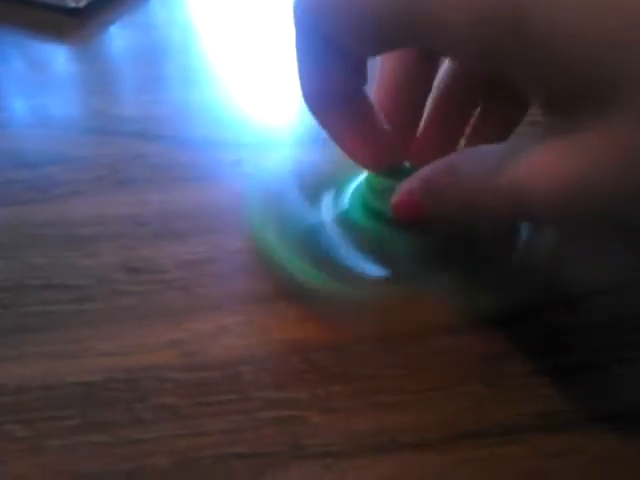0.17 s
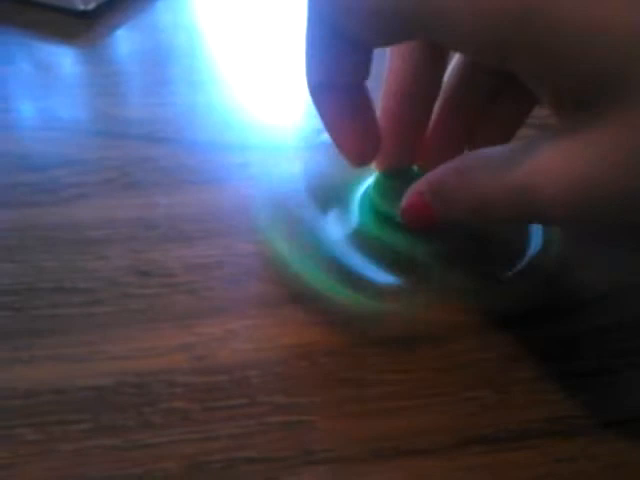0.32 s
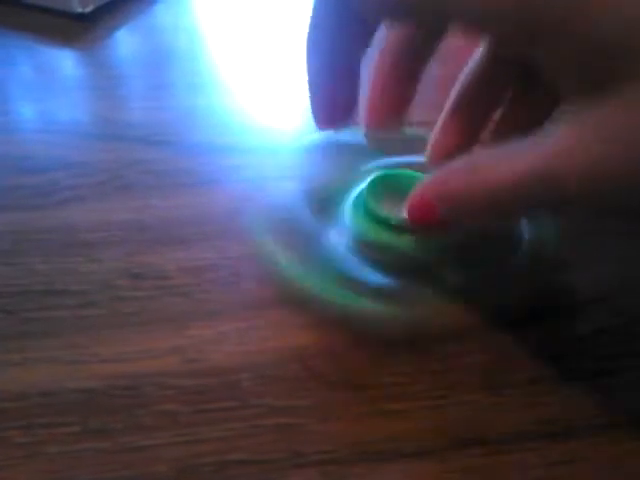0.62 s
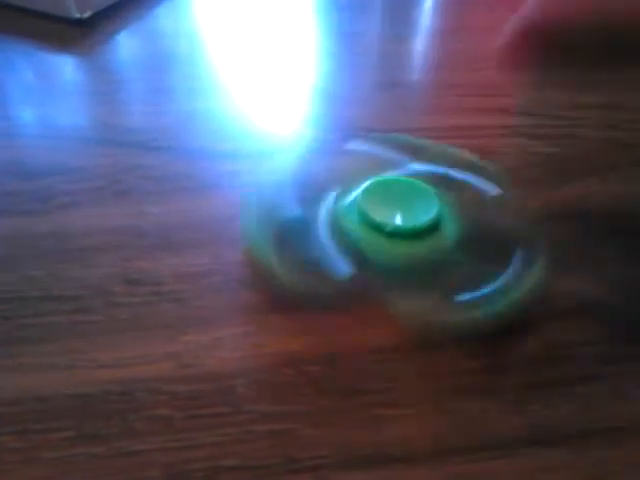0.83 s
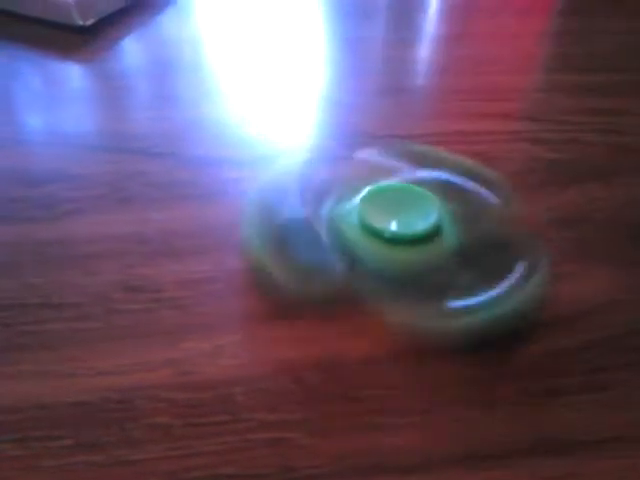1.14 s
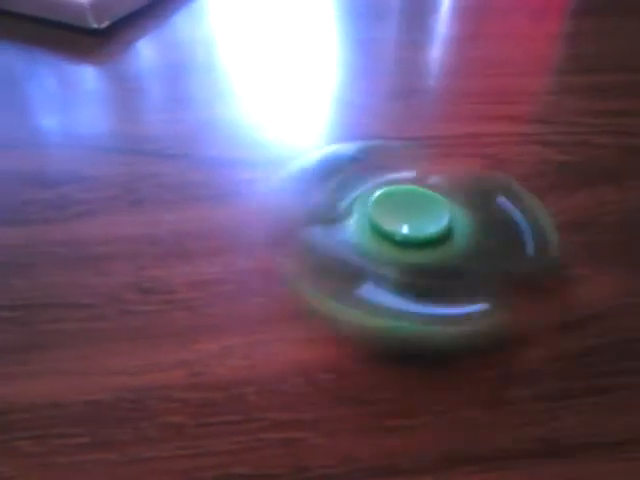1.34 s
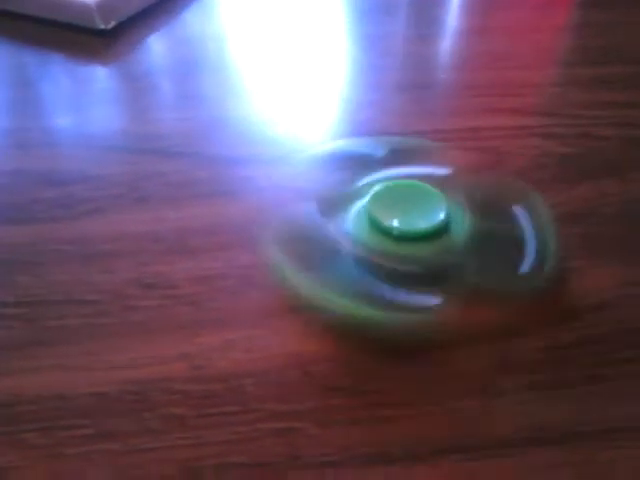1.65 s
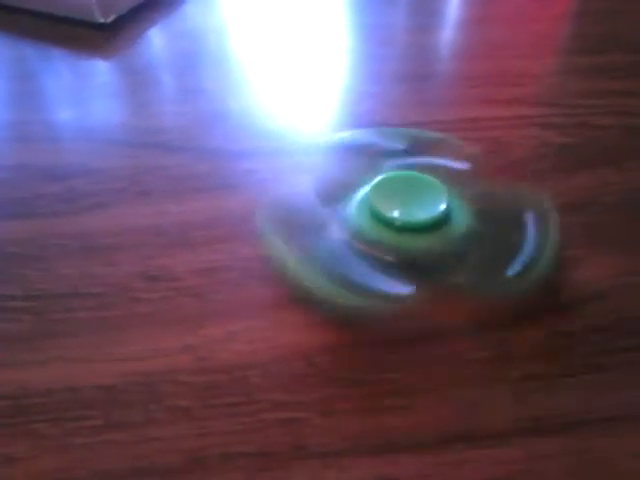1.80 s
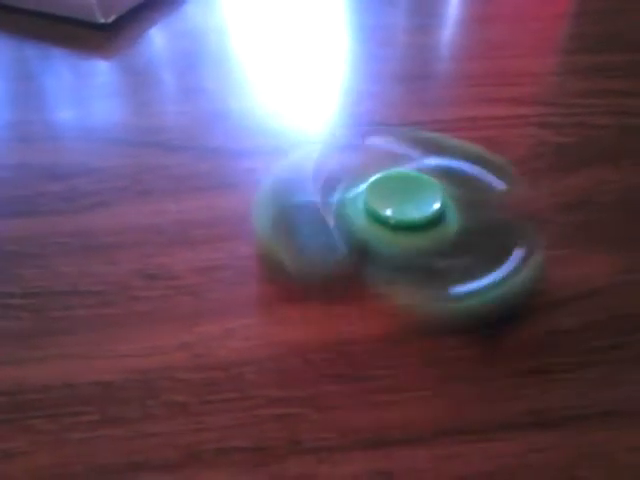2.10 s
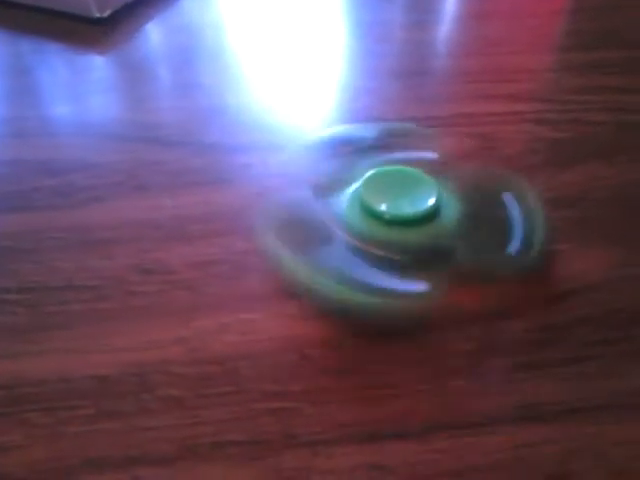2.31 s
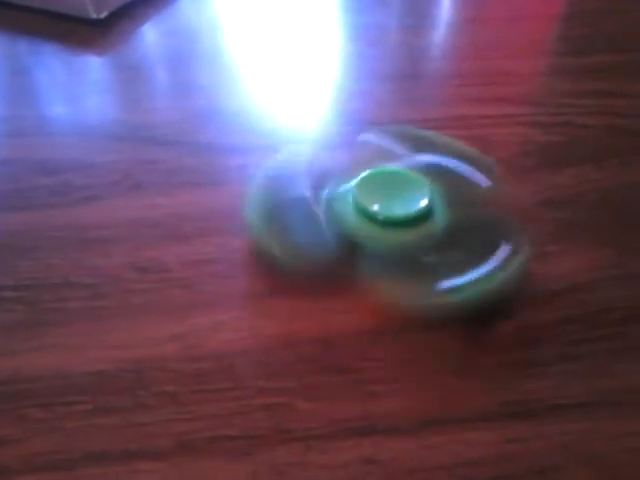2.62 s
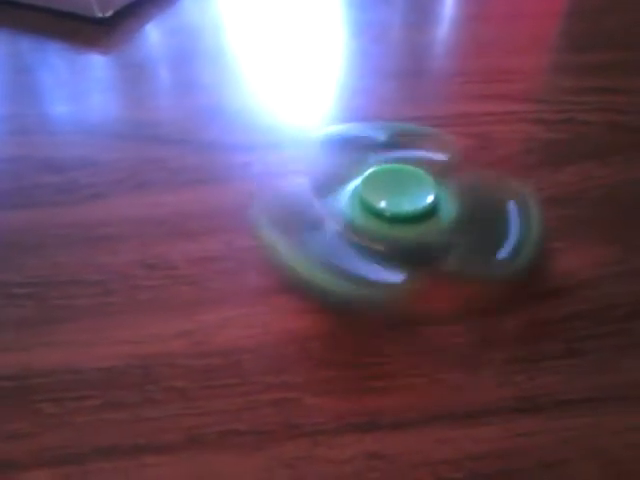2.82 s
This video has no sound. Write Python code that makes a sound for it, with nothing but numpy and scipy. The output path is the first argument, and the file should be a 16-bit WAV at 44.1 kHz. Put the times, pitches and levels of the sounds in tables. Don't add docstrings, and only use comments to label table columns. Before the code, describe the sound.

Close, dry sound of a wobbling plastic spinner on wood: regular bright ticks with dull knocks, rough rubbing and hand thumps at first, then irregular clicks thinning out over faint room hiss.

```python
import sys
import numpy as np
from scipy import signal
from scipy.fft import rfft, irfft
from scipy.io import wavfile
from scipy.ndimage import uniform_filter1d

SR = 44100
rng = np.random.default_rng(int(sys.argv[2]) if len(sys.argv) > 2 else 0)


def nominal_scale(level):
    x = np.asarray(level, float) / 20
    return 10 ** x


def put_to_file(sound):
    columns = np.atleast_2d(sound).T
    safe = np.clip(columns, -1, 1)
    whole_steps = np.round(safe * 32767)
    wavfile.write(sys.argv[1], SR, whole_steps.astype(np.int16))


N = 130095
EDGE_HZ = 14300

# frequency in Hz, level in dB, t60 in seconds.
WOOD = [(116.9, -2, 0.14), (157.1, -6.5, 0.19), (210.7, -3.5, 0.15), (229.1, 3.5, 0.072),
        (273.5, 1.5, 0.082), (304.2, -4, 0.09), (342, -2, 0.085), (396, -1.5, 0.09), (537, -8, 0.054),
        (616, -6, 0.085), (845, -27, 0.061)]


def evened(x):
    return x / np.sqrt(np.mean(x ** 2) + 1e-20)


def curve_at(points, hz):
    f, value = np.transpose(points)
    return np.interp(np.log(hz + 1), np.log(f + 1), value)


def add(mix, start_s, sound):
    part = mix[round(start_s * SR):][:len(sound)]
    part += sound[:len(part)]


def colour(x, points):
    gain = nominal_scale(curve_at(points, np.fft.rfftfreq(len(x), 1 / SR)))
    return irfft(rfft(x) * gain, len(x))


def slow(size):
    smooth = uniform_filter1d(rng.standard_normal(N), size)
    return evened(uniform_filter1d(smooth, size))


def crackle(shape):
    clicks_per_s, spread_db = 4600, 1
    size = nominal_scale(spread_db * np.minimum(rng.exponential(1, shape), 4)) * rng.standard_normal(shape)
    return evened(size * (rng.random(shape) < clicks_per_s / SR))


def body(modes, detune=0, luck=1):
    t = np.arange(SR // 6) / SR
    hz, db, t60 = np.transpose(modes)[:, :, None]
    decay = nominal_scale(db - 60 * t / t60)
    ring = (luck * decay * np.sin(2 * np.pi * hz * (1 + detune) * t)).sum(0)
    return ring / np.linalg.norm(ring)


def alternating(modes):
    return (-1.) ** np.arange(len(modes))[:, None]


def hush():
    # frequency in Hz, level in dB per Hz.
    hush_tone = [(25, -4), (55, 2.5), (130, -10.5), (260, -4), (509, -12.5), (845, -16), (2150, -21.5),
                 (13500, -24), (14700, -23.5)]
    level_db, patch_db = -66.5, 2
    level = nominal_scale(level_db + patch_db * slow(size=500))
    return level * evened(colour(rng.standard_normal(N), hush_tone))


def thumps():
    # start in seconds, length in seconds, level in dB.
    pushes = [(0.051, 0.049, -59), (0.199, 0.048, -37), (0.417, 0.024, -35.5), (0.451, 0.032, -31.5),
              (0.546, 0.034, -41.5), (0.599, 0.085, -42.5), (0.765, 0.068, -49), (0.907, 0.051, -44),
              (0.969, 0.026, -49), (1.027, 0.028, -44.5), (1.12, 0.1, -47), (1.275, 0.046, -57),
              (1.396, 0.011, -41.5), (1.444, 0.02, -64), (1.508, 0.075, -41), (1.585, 0.12, -57),
              (1.675, 0.026, -49), (1.723, 0.042, -51), (1.887, 0.022, -54), (2.265, 0.046, -56),
              (2.376, 0.051, -61.5), (2.553, 0.066, -41), (2.599, 0.044, -40.5), (2.748, .03, -55),
              (2.776, 0.047, -49.5), (2.924, .03, -47)]
    mode_hz, width_hz, trim_db = 51.1, 15.4, -4
    b, a = signal.iirpeak(mode_hz, mode_hz / width_hz, SR)
    low = signal.lfilter(b, a, signal.lfilter(b, a, rng.standard_normal(N)))
    out = np.zeros(N)
    for start_s, length_s, db in pushes:
        piece = low[round(start_s * SR):][:round((length_s + .02) * SR)]
        thump = evened(piece) * signal.windows.tukey(len(piece), .6)
        add(out, start_s - 0.00966 * (start_s > .01), nominal_scale(db + trim_db) * thump)
    return out


def spells(column):
    # start in seconds, length in seconds, rumble level in dB, rub level in dB.
    contacts = [(0, 0.3, -59.5, -92), (0.198, 0.082, -48, -62.5), (0.312, 0.1, -50, -62.5),
                (0.412, 0.13, -46.5, -59), (0.558, 0.16, -45, -59), (0.7, 0.15, -51, -61.5),
                (0.912, 0.089, -50, -59.5), (1.023, 0.12, -53, -63.5), (1.129, 0.095, -48.5, -58),
                (1.33, 0.051, -60, -61.5), (1.42, 0.064, -65, -63), (1.499, 0.11, -47.5, -54),
                (1.603, 0.097, -48.5, -58), (1.703, 0.096, -56, -70), (2.56, 0.098, -53.5, -64.5),
                (2.604, 0.053, -56, -54.5), (2.664, 0.15, -61, -71.5), (2.813, 0.2, -67.5, -75)]
    rise_s, fall_s = 0.0023, 0.031
    t, level = np.arange(N) / SR, np.zeros(N)
    for row in contacts:
        since_s = t - row[0]
        rise = np.clip(since_s / rise_s, 0, 1)
        fall = np.exp(-np.maximum(since_s - row[1] + fall_s, 0) ** 2 / fall_s ** 2)
        level += nominal_scale(row[column]) * rise * fall
    return level


def rocking():
    # frequency in Hz, level in dB, t60 in seconds.
    scrape = [(710, 5, 0.0037), (1635, -11, 0.011)]
    bumps_per_s, spread_db, trim_db, scrape_db = 300, 2, -3, -9.5
    size = nominal_scale(spread_db * np.minimum(rng.exponential(1, N), 2.5)) * rng.choice([-1., 1.], N)
    hits = evened((rng.random(N) < bumps_per_s / SR) * size)
    hits = hits * spells(column=2) * nominal_scale(trim_db)
    response = body(WOOD, 0, alternating(WOOD)) + nominal_scale(scrape_db) * body(scrape)
    return signal.fftconvolve(hits, response)[:N]


def whirr():
    # frequency in Hz, level in dB per Hz.
    whirr_tone = [(350, -28), (600, -6.5), (1530, -14), (2230, -15.5), (3800, -12.5), (4120, -17.5),
                  (8040, -15.5), (9560, -10), (14700, -31)]
    trim_db, flicker_db = -1, 1.6
    hiss = evened(colour(rng.standard_normal(N), whirr_tone))
    return hiss * spells(column=3) * nominal_scale(trim_db + flicker_db * slow(size=300))


def bumps():
    # time of the peak in seconds, peak level in dB, pitch in Hz.
    nods = [(0.056, -42, 260), (0.074, -53, 260), (0.091, -47, 247), (0.15, -47, 276), (0.174, -45.5, 268),
            (0.193, -46, 260), (.212, -35.5, 262), (0.241, -62, 270), (0.348, -45, 306),
            (0.378, -34.5, 230), (0.412, -36.5, 271), (0.515, -34.5, 260), (0.527, -38, 164),
            (0.588, -39, 314), (0.636, -35.5, 254), (0.649, -34.5, 202), (.685, -40, 219),
            (0.734, -32, 260), (0.746, -36.5, 180), (0.791, -37, 230), (0.841, -41, 224), (0.944, -37, 285),
            (.975, -42.5, 248), (1.049, -44, 260), (1.09, -33.5, 260), (1.151, -29, 257),
            (1.165, -33.5, 257), (1.2, -37, 227), (1.439, -42.5, 240), (1.462, -44, 234), (1.531, -32, 200),
            (1.576, -33, 224), (1.59, -46, 260), (1.636, -33.5, 233), (1.673, -40, 260),
            (1.791, -41.5, 267), (1.722, -41, 495), (2.013, -46.5, 260), (2.106, -40.5, 372),
            (2.279, -42, 290), (2.39, -47.5, 120), (2.496, -57, 253), (2.572, -47, 237),
            (2.634, -38.5, 302), (2.755, -41.5, 262)]
    rise_s, t60_s = 0.0031, 0.045
    t, out = np.arange(SR // 10) / SR, np.zeros(N)
    after_s = t - rise_s
    shape = np.minimum(t / rise_s, 1) ** 2 * nominal_scale(-60 * np.maximum(after_s, 0) / t60_s)
    for peak_s, db, hz in nods:
        add(out, peak_s - rise_s, -nominal_scale(db) * shape * np.cos(2 * np.pi * hz * after_s))
    return out


def wood_knock(push, snap, grit, shift, rim_db):
    # frequency in Hz, level in dB, t60 in seconds.
    rim_modes = [(885, -3, 0.051), (1526, 1, 0.048)]
    roughness, mode_bias, low_cut_hz, rim_detune = 0.4, .5, 260, .04
    luck = np.tanh(2 * (mode_bias + shift[:len(WOOD)]))
    knock = signal.fftconvolve(push * (1 + roughness * grit), body(WOOD, 0, luck))
    knock = signal.lfilter(*signal.butter(2, low_cut_hz, "high", fs=SR), knock)
    rim = signal.fftconvolve(snap * grit, body(rim_modes, rim_detune * shift[-2:]))
    knock = knock / np.linalg.norm(knock) + nominal_scale(rim_db) * rim / np.linalg.norm(rim)
    return knock / np.linalg.norm(knock)


def ticks():
    # time in seconds, cap ring level in dB, weight ring level in
    # dB, arm ring level in dB, knock on wood level in dB.
    tick_rows = [(0.0528, -75, -77, -68, -57), (0.2293, -52.5, -64.5, -59, -51),
                 (0.2642, -48.5, -78, -74, -50.5), (0.3153, -50.5, -62, -66, -38.5),
                 (0.3645, -47, -71, -68, -38.5), (0.4639, -42.5, -52, -53.5, -37.5),
                 (0.5635, -48.5, -66, -86, -35.5), (0.615, -44.5, -55, -62, -33),
                 (0.665, -39, -43.5, -44, -33.5), (.67, -43, -47, -56, -39), (0.7179, -27.5, -33.5, -41, -34.5),
                 (0.7691, -35.5, -42, -51.5, -36.5), (0.8191, -39, -51, -61, -41),
                 (0.9204, -36.5, -49.5, -50.5, -37), (.9248, -44, -52, -52, -38.5),
                 (.9707, -65, -63, -60.5, -50), (1.0268, -42, -60, -51.5, -38.5), (1.0749, -52, -62, -60, -50.5),
                 (1.129, -38.5, -66, -84, -34), (1.1815, -36.5, -49.5, -47.5, -41.5),
                 (1.2318, -57, -62, -56, -51),
                 (1.2844, -36.5, -43, -39, -40.5), (1.3383, -66, -65, -60.5, -40),
            (1.3973, -39, -47, -40.5, -41), (1.501, -43, -43.5, -44.5, -41.5),
            (1.5071, -37, -45, -43, -32.5), (1.5148, -48, -49, -44.5, -61),
            (1.5574, -43.5, -56, -52, -37.5), (1.5606, -58, -44, -50, -37.5),
            (1.608, -33, -35, -44.5, -33.5), (1.618, -36.5, -39, -50, -45), (1.626, -48, -60, -53, -55),
            (1.6473, -42, -47.5, -56, -43), (1.6608, -42, -47.5, -78, -48),
            (1.716, -31, -40.5, -38.5, -38.5), (1.7728, -40, -47.5, -55.5, -47.5),
            (1.8839, -38.5, -45, -57.5, -45), (2.0081, -60, -67.5, -65.5, -50),
            (2.102, -40.5, -40, -54.5, -48), (2.2755, -39, -45.5, -58.5, -58.5),
            (2.387, -35, -41, -70, -52), (2.616, -37, -44, -50.5, -33.5), (2.6783, -52.5, -66, -64, -46),
            (2.734, -52.5, -59, -60, -50), (2.816, -63, -69, -69, -54.5)]
    # frequency in Hz, level in dB, t60 in seconds.
    cap = [(7980, -12, 0.0086), (9070, 1, 0.0064), (9730, 0, 0.0071), (10950, 2.5, 0.0022),
           (13200, -26, 0.00077), (11740, -10, 0.0066)]
    weight = [(5390, -3.5, 0.0034), (6110, -2, 0.0064), (6940, 1.5, 0.0079), (7190, -3, 0.0019)]
    arm = [(1574, -9.5, 0.0072), (2540, -3.5, 0.019), (3240, 4, 0.0049), (3450, 0, 0.024), (3866, 5, 0.012),
           (4650, -12.5, 0.0093)]
    # frequency in Hz, level in dB per Hz.
    loose_tone = [(900, 3), (2400, -31), (3500, 0), (5000, -2.5), (10000, 19.5), (15000, -3.5)]
    contact_s, knock_rise_s = 0.0012, 0.00065
    ring_trim_db, cap_trim_db, knock_trim_db, rim_db = 2.5, -3, 1.5, -14
    chatter_db, chatter_t60_s, chatter_end_s, loose_db = -12, 0.12, 0.054, -18
    detune, loose_detune = .02, .05

    t, out = np.arange(SR // 8) / SR, np.zeros(N)
    snap = ((t / contact_s) * np.exp(1 - t / contact_s)) ** 2
    push = (t / knock_rise_s) * np.exp(1 - t / knock_rise_s)
    chatter = nominal_scale(-60 * t / chatter_t60_s) * np.minimum(t / 0.0023, 1)
    chatter *= np.exp(-(t / chatter_end_s) ** 4)
    rows = tick_rows
    grits = rng.standard_normal((len(rows), 5, len(t)))
    shifts = rng.standard_normal((len(rows), 4, 14, 1))
    balls = crackle((len(rows), 3, len(t)))
    for (s, cap_db, weight_db, arm_db, wood_db), grit, shift, ball in zip(rows, grits, shifts, balls):
        levels_db = [cap_db + cap_trim_db, weight_db + ring_trim_db, arm_db + ring_trim_db]
        for k, modes in enumerate([cap, weight, arm]):
            ring = body(modes, detune * shift[k, :len(modes)], alternating(modes))[:1500]
            hit = signal.fftconvolve(snap * grit[k], ring)
            hit *= np.linalg.norm(snap) / np.linalg.norm(hit)
            loose_ring = body(modes, loose_detune * shift[k, ::-1][:len(modes)])[:1500]
            rattle = signal.fftconvolve(chatter * ball[k], loose_ring)
            add(out, s - .0006, nominal_scale(levels_db[k]) * (hit + nominal_scale(chatter_db) * rattle))
        broad = evened(colour(grit[4], loose_tone)) * (snap + chatter)
        add(out, s - .0006, np.linalg.norm(nominal_scale(levels_db)) * nominal_scale(loose_db) * broad)
        rim_share_db = rim_db + .5 * (max(levels_db) - wood_db)
        knock = wood_knock(push, snap, grit[3], shift[3], rim_share_db)
        add(out, s - .001, nominal_scale(wood_db + knock_trim_db + 22.5) * knock)
    return out


def scene():
    mid = hush() + thumps() + rocking() + whirr() + bumps() + ticks()
    mid = signal.sosfilt(signal.butter(3, 36, "high", fs=SR, output="sos"), mid)
    return np.array([mid, mid])


def swapped(mid):
    # frequency in Hz, share of blocks swapped (0 to 1).
    swap_share = [(4000, 0), (5000, .12), (7000, .4), (9500, .65), (13500, .55), (14500, 0)]
    side_db, jump_db = -1.5, 8.5
    hz, _, z = signal.stft(mid, SR, nperseg=512, noverlap=384)
    field = rng.random((z.shape[1] // 12 + 1, z.shape[0] // 10 + 1))
    field = field.repeat(12, axis=0).repeat(10, axis=1)
    on = field[:z.shape[1], :z.shape[0]].T < curve_at(swap_share, hz)[:, None]
    treble_db = 10 * np.log10((abs(z[50:]) ** 2).sum(0) + 1e-14)
    jump = np.r_[treble_db[4:] - treble_db[:-4], np.zeros(4)] > jump_db
    calm = uniform_filter1d(jump * 1., size=9, origin=3) < .01
    level = np.sqrt(uniform_filter1d(abs(z) ** 2, size=5, axis=0))
    phase = np.exp(2j * np.pi * rng.random(z.T.shape).T)
    side = signal.istft(level * on * calm * phase, SR, nperseg=512, noverlap=384)[1][:N]
    return 2 * nominal_scale(side_db) * side


def top_on_attacks(x):
    top_hz, jump_db, level_db = 16100, 8, -13
    top = signal.sosfiltfilt(signal.butter(4, [EDGE_HZ, top_hz], "band", fs=SR, output="sos"), x)
    power = abs(uniform_filter1d(top ** 2, size=180)) + 1e-14
    opened = power > nominal_scale(2 * jump_db) * np.roll(power, shift=200, axis=1) + 1e-7
    return nominal_scale(level_db) * top * uniform_filter1d(opened * 1., size=60)


def low_pass(x):
    return signal.sosfilt(signal.butter(12, 16150, fs=SR, output="sos"), x)


def record(dry):
    # centre in seconds, length in seconds, depth in dB.
    gate = [
        (0.911, 0.03, -8.5),
        (1.84, 0.0054, -30),
        (1.969, 0.0056, -35),
        (2.893, 0.0044, -33),
    ]
    offset = -.0012
    t = np.arange(N) / SR
    gate_db = sum(db * np.exp(-((t - s) / length_s * 2) ** 4) for s, length_s, db in gate)
    gated = dry * nominal_scale(gate_db)
    wide = gated + swapped(gated[0]) * np.array([[1], [-1]])
    taps = signal.firwin(255, EDGE_HZ, window=("kaiser", 7), fs=SR)
    limited = signal.oaconvolve(wide, taps[None], "same")
    return low_pass(limited + top_on_attacks(gated) + offset)


dry = scene()
out = record(dry)
put_to_file(out)
```